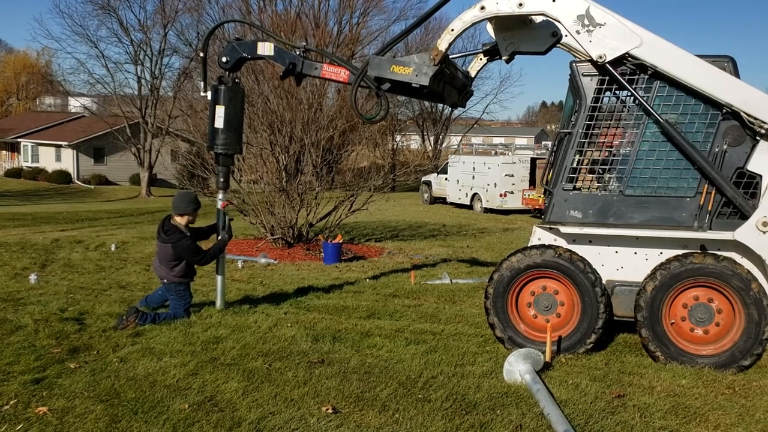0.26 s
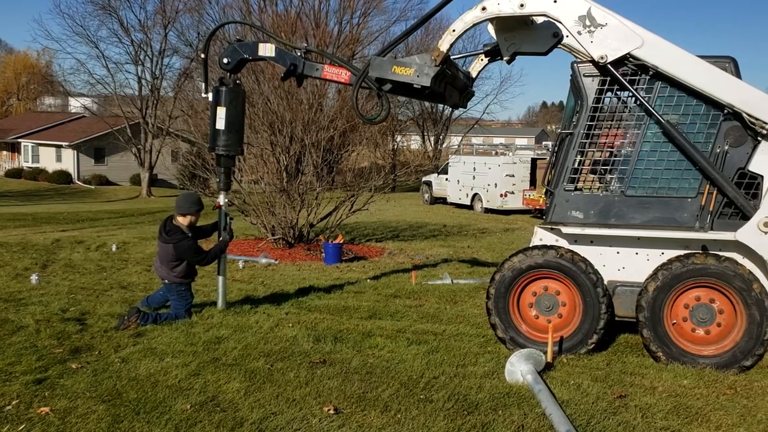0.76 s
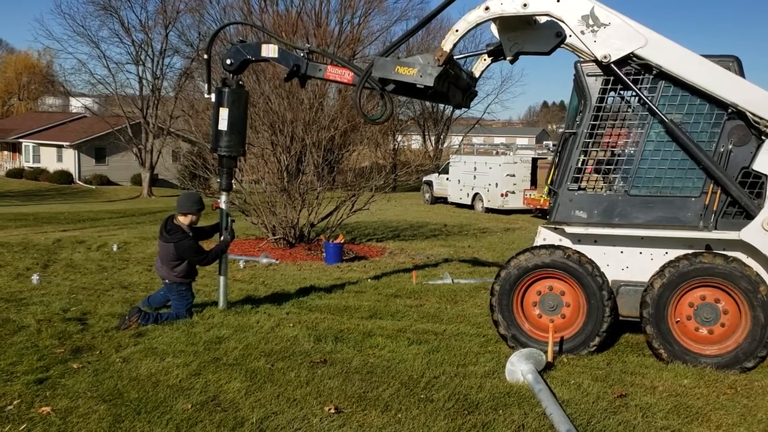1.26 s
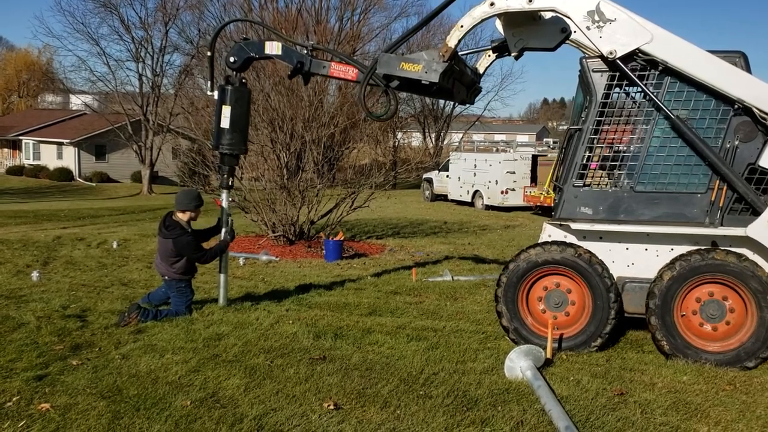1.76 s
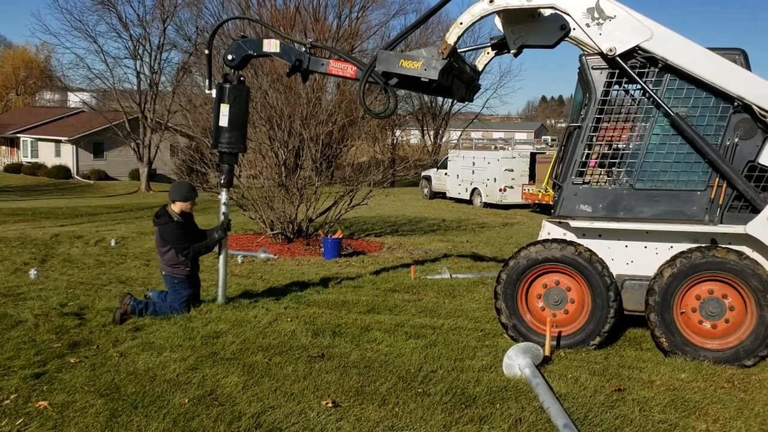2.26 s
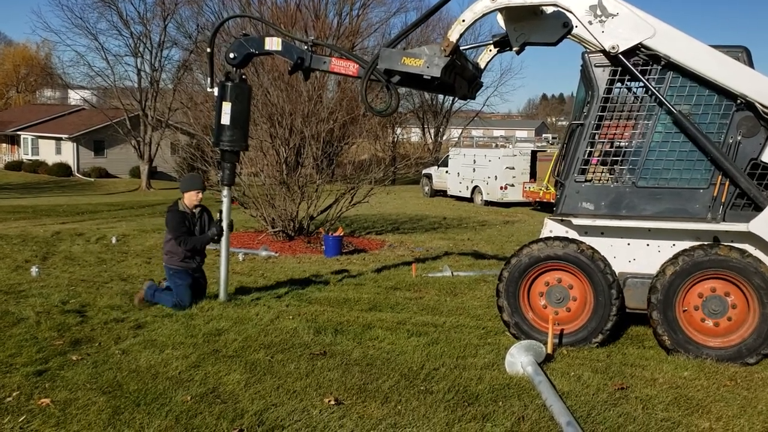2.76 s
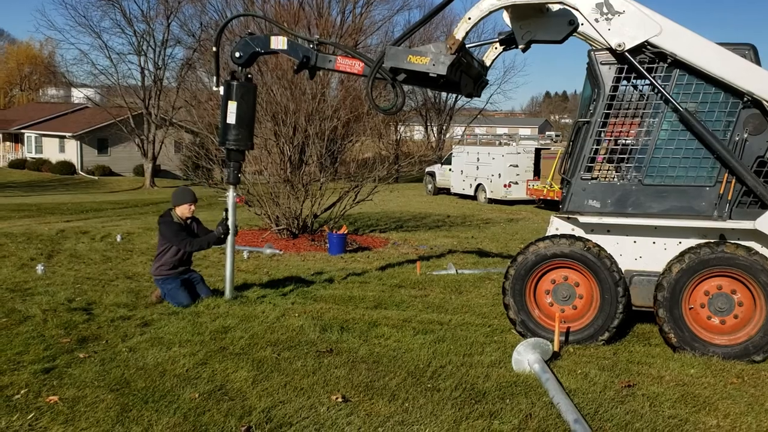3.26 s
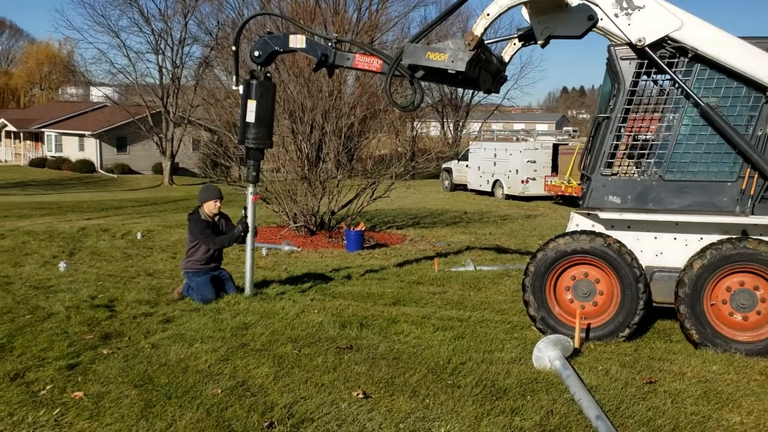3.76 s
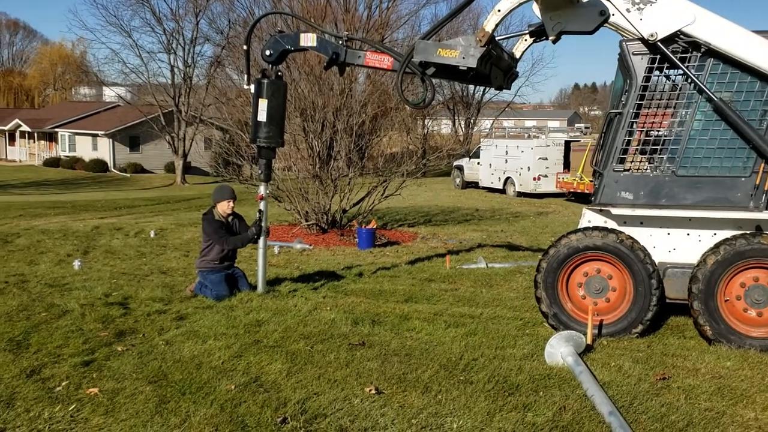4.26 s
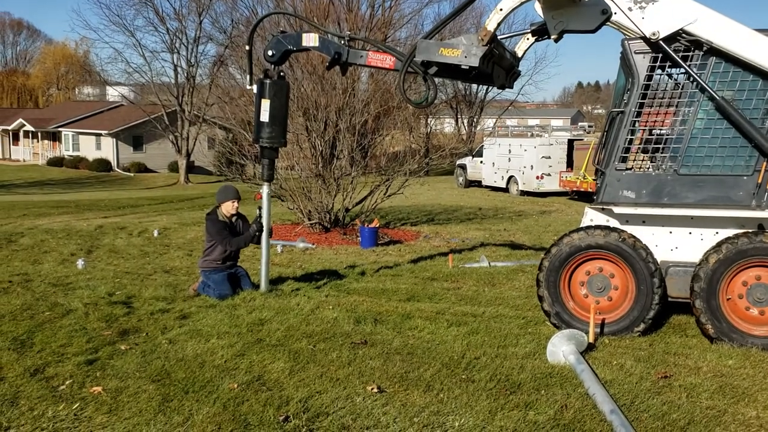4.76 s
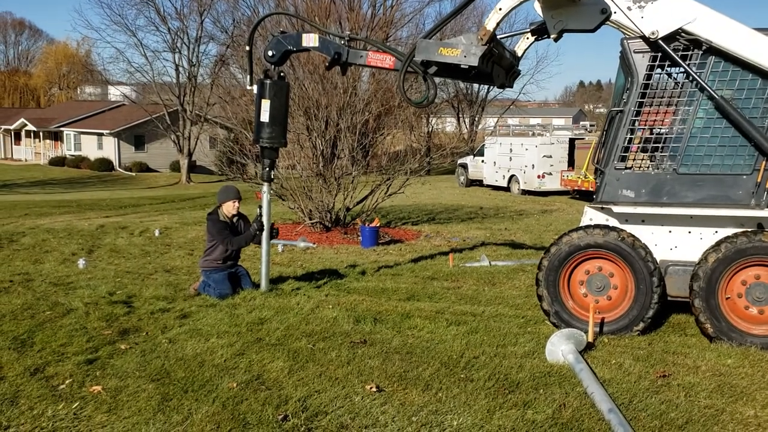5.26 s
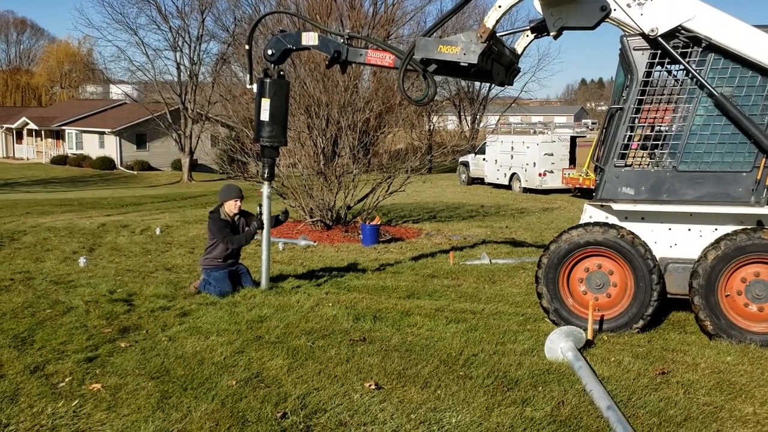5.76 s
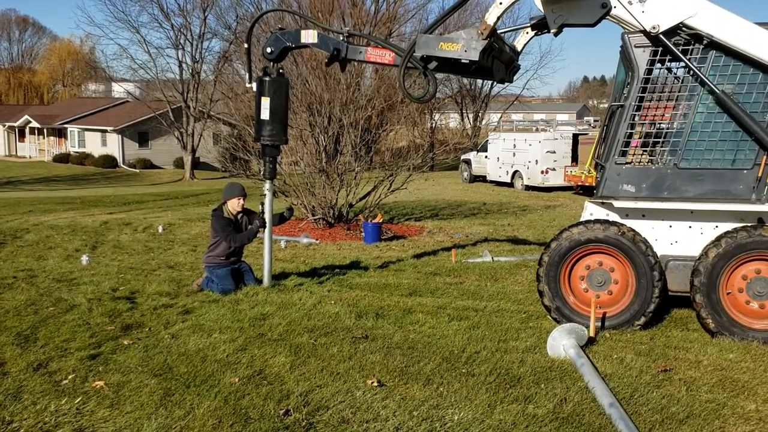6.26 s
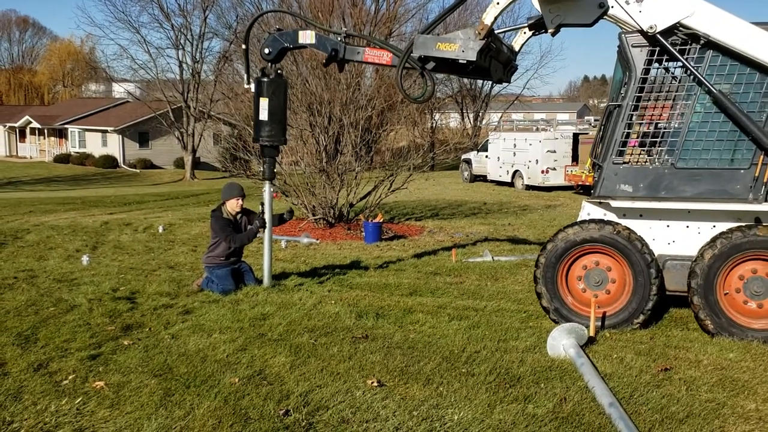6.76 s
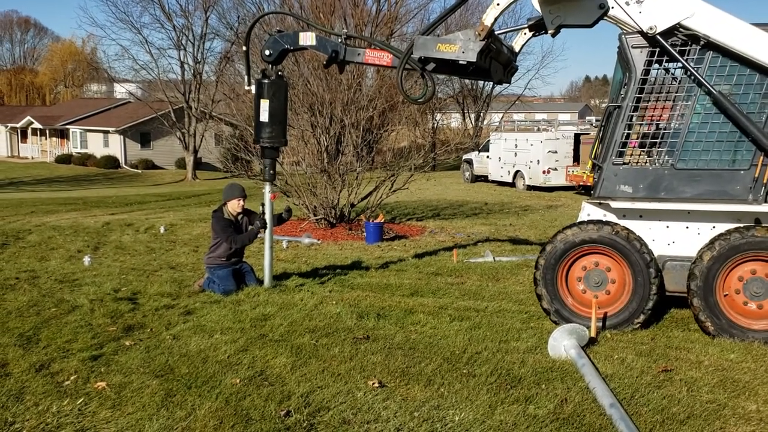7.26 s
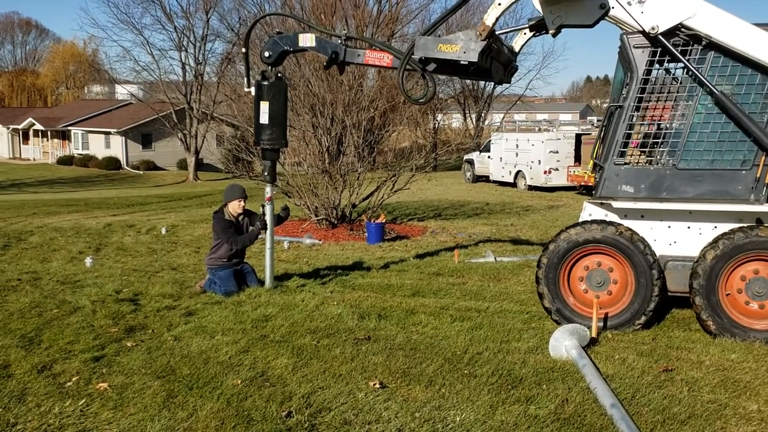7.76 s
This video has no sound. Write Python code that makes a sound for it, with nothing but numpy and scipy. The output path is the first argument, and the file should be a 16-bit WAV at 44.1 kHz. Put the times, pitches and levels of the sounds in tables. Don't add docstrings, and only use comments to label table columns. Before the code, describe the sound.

Outdoors on an open lawn, a four-cylinder diesel loader runs a few metres away, to the right. A deep, constant exhaust drone carries quick panel knocks, rough fan and valve-gear rush, and a hydraulic whine. Thin oil hiss sits on top, with two faint airy whistles around two and three seconds. Wind thumps the stereo microphone often at first, then occasionally.

```python
import sys
import numpy as np
from scipy import signal
from scipy.fft import rfft, irfft, next_fast_len
from scipy.io import wavfile
from scipy.ndimage import uniform_filter1d, map_coordinates

SR = 44100
rng = np.random.default_rng(int(sys.argv[2]) if len(sys.argv) > 2 else 0)


def invert_db(level):
    return 10 ** (np.asarray(level, dtype=float) / 20)


def generate_wav(sig):
    pcm = np.round(np.clip(np.atleast_2d(sig).T, -1, 1) * 32767).astype(np.int16)
    wavfile.write(sys.argv[1], SR, pcm)


N = 352800


def unit(x):
    return x / np.sqrt(np.mean(x ** 2) + 1e-20)


def along(points, hz):
    f, v = np.transpose(points)
    return np.interp(np.log(hz + 1), np.log(f + 1), v)


def curves(rows):
    s, *cols = np.transpose(rows)
    return [np.interp(np.arange(N) / SR, s, c) for c in cols]


def wobble(rate_hz):
    knots = rng.standard_normal(int(N * rate_hz / SR) + 4)
    return map_coordinates(knots, [np.arange(N) * rate_hz / SR])


def swells(s, half_s, db):
    t = np.arange(0, N + 64, 64) / SR
    bells = db * np.exp(-((t[:, None] - s) / half_s) ** 2)
    return np.interp(np.arange(N) / SR, t, bells.sum(axis=1))


def filtered(x, response):
    m = next_fast_len(N + SR // 2)
    return irfft(rfft(x, m) * response(np.fft.rfftfreq(m, 1 / SR)), m)[..., :N]


def noise(spectrum, alike, patchy_db):
    z = signal.stft(rng.standard_normal((2, N)), nperseg=512)[2]
    field = rng.standard_normal(z.shape[1:])
    field = uniform_filter1d(uniform_filter1d(field, size=8, axis=0), size=8, axis=1)
    pair = signal.istft(z * invert_db(patchy_db * unit(field)), nperseg=512)[1][:, :N]

    def mid_side(hz):
        angle = np.arccos(np.clip(along(alike, hz), -1, 1)) / 2
        return invert_db(along(spectrum, hz)) * [np.cos(angle), np.sin(angle)]

    mid, side = filtered(pair, mid_side)
    return unit(np.array([mid + side, mid - side]))


def exhaust(cycle, note_db):
    # order, level/dB
    orders = [(3, -33), (4, -1.5), (5, -79), (7, -53.5), (8, -14.5), (9, -53), (11, -49.5), (12, -30),
              (13, -38.5)]
    # t/s, level/dB
    puffs = [(.12, 1), (.17, -17), (.22, 3.5), (.27, -4), (.325, 11), (.405, -18), (.47, 2), (.51, -16),
             (.55, 5.5), (.59, -22), (.65, 1), (.76, 0), (.85, 6.5), (.95, -2), (1.17, 7), (1.23, -7),
             (1.4, -6), (1.46, -17), (1.58, 6.5), (1.69, -7), (2.11, -2), (2.39, -3), (2.78, -1),
             (3.06, -2.5), (4.69, 0), (5.76, -2), (5.85, -3.5), (6.01, -2.5), (6.52, -3), (6.83, -1.5)]
    puff_half_s, crest_rad, full_note_db, brightens = .021, .075, 30, 0.68
    s, puff_db = np.transpose(puffs)
    sway_db = swells(s, puff_half_s, puff_db)
    slack_db = np.minimum(note_db - full_note_db, 0)
    total = 0
    for k, db in orders:
        level_db = db + note_db + 3.5 + 0.24 * wobble(30) + sway_db * (4 / k) ** 2
        level_db = level_db + brightens * slack_db * (k / 4 - 0.5)
        total = total + invert_db(level_db) * np.cos(k * (2 * np.pi * cycle + crest_rad) - .3)
    return total


def knock(cycle):
    # f/Hz, width/Hz, level/dB
    panel_modes = [(525, 22, -3.6), (585, 20.5, 0)]
    # f/Hz, width/Hz, level/dB
    frame_modes = [(821, 48, -16.5), (1520, 63, -14), (2245, 240, -18), (2885, 140, -17), (3950, 307, -23)]
    knock_at_cycles, jitter_cycles, spread_db = .405, 0.0022, 0.5
    panel_late_s, rebound_s, rebound_db = .00446, .01772, -5
    turns = np.arange(int(cycle[-1]))
    chance = rng.standard_normal((len(turns), 2))
    at = np.interp(turns + knock_at_cycles + jitter_cycles * chance[:, 0], cycle, np.arange(N)).astype(int)
    blows = np.bincount(at, invert_db(spread_db * chance[:, 1]), N)

    def ring(f, modes):
        total = 0
        for k, (c, w, db) in enumerate(modes):
            total = total + (-1) ** k * invert_db(db) * 1j * f * w / (c * c - f * f + 1j * f * w)
        return total

    def late(f, s):
        return np.exp(-2j * np.pi * f * s)

    def response(f):
        twice = late(f, panel_late_s) * (1 + invert_db(rebound_db) * late(f, rebound_s))
        soft = 1 / (1 + 1j * f / 3500) ** 4
        return (ring(f, panel_modes) * twice + ring(f, frame_modes)) * soft

    return unit(filtered(blows, response))


def rush(cycle):
    # f/Hz, density/dB per Hz
    bay_spectrum = [(40, -63.5), (150, -59), (310, -70.5), (560, -57), (900, -67.5), (1400, -66.5),
                    (2200, -66), (2600, -75), (2800, -74.5), (3200, -81), (3900, -79.5), (4600, -81),
                    (5000, -81), (5600, -83), (7200, -105), (9000, -125)]
    # f/Hz, left-right likeness
    bay_alike = [(100, .97), (1000, .92), (2300, .85), (3250, .4), (3900, .9), (4600, .84), (5400, .72),
                 (5800, .75), (6300, .3)]
    rattle_swell_db, rattle_at_cycles = 5, .62
    pulse_db = 0.55 * np.cos(8 * np.pi * cycle) + 0.12 * wobble(4.9) + 0.85 * wobble(260)
    bay = invert_db(pulse_db) * noise(bay_spectrum, bay_alike, patchy_db=0.65)
    rattle_spectrum = [(300, -16), (470, -3.0), (545, 25), (680, 6.0), (900, -44), (3000, -120)]
    swell_db = rattle_swell_db * np.cos(2 * np.pi * (cycle - rattle_at_cycles))
    rattle = invert_db(swell_db) * noise(rattle_spectrum, [(500, 0.94)], patchy_db=-1.5)
    return unit(bay) + invert_db(-10.0) * unit(rattle)


def clatter(cycle):
    # order, level/dB
    high_orders = [(44, 0.5), (56, -7.5), (62, -12), (68, -2), (75, 0.5), (77, 1.5), (81, -10), (93, -10.5),
                   (96, -11.5), (100, -4), (115, -11), (154, -15.5)]
    total = 0
    for k, db in high_orders:
        phase_cycles = k * cycle + 0.14 * wobble(7.6)
        total = total + invert_db(db + 2.8 * wobble(3.2)) * np.sin(2 * np.pi * phase_cycles)
    return total


def whine(cycle):
    # multiple of pump rate, level/dB
    pulsation = [(2, 11), (4, 2), (10, -13), (14, -8.5)]
    # t/s, level/dB
    load = [(0, -4.5), (1.65, -4), (1.85, -0.5), (4, 0), (6.7, 0), (7, -1.5), (8, -1.5)]
    # f/Hz, level/dB
    fan_hz, fan_db = (272.1, .5)
    pump_ratio, overtone_db = 2.6681, 0
    pump = 0
    for k, db in pulsation:
        phase_cycles = k * 4 * pump_ratio * cycle + 0.024 * k * wobble(5.4)
        pump = pump + invert_db(db + 1.2 * wobble(5.8)) * np.sin(2 * np.pi * phase_cycles)
    blades = 2 * np.pi * (fan_hz * np.arange(N) / SR + .08 * wobble(6))
    fan = invert_db(fan_db + 1.8 * wobble(5)) * (np.sin(blades) + invert_db(overtone_db) * np.sin(2 * blades))
    return invert_db(curves(load)[0]) * pump + fan


def hiss():
    # f/Hz, density/dB per Hz
    oil_spectrum = [(5000, -45), (7200, -10), (9500, -8.5), (10300, -8.5), (12000, 0), (14000, -0.5),
                    (15740, 0.5), (15800, -35)]
    grain_db = .9 * wobble(22) + .7 * wobble(40) + 1.2 * wobble(400)
    oil_alike = [(8000, .3), (11000, .3), (14500, .6)]
    return unit(invert_db(grain_db) * noise(oil_spectrum, oil_alike, patchy_db=.9))


def spool():
    # t/s, half length/s, level/dB
    strokes = [
        (1.9, 0.3, 20),
        (2.995, .35, 24.5),
    ]
    # f/Hz, density/dB per Hz
    whistle_band = [(13000, -42.5), (14000, -3.5), (14500, -2.5), (15000, -6.5), (15700, -42)]
    level_db = -36.5 + swells(*np.transpose(strokes))
    return invert_db(level_db) * noise(whistle_band, [(14500, 0.54)], patchy_db=0.5)


def wind():
    # t/s, strength/dB
    strength = [(0, -40), (.6, -41), (1.05, -38.5), (1.35, -40), (1.7, -38), (1.9, -40), (2.6, -42),
                (3, -39), (3.3, -46.5), (4.4, -43.5), (4.8, -44.5), (5.4, -44.5), (5.8, -41), (6.8, -41),
                (7.1, -45), (8, -43.5)]
    # t/s, half length/s, buffet/dB, flutter/dB over the wind
    gusts = [(0.015, 0.04, 10.5, 1), (0.172, 0.054, 12.5, 5.5), (0.338, 0.035, 17, 10.5),
             (0.444, .06, 5, 11), (0.562, 0.041, 7.5, 8.5), (0.715, 0.044, 8, 4), (0.842, 0.037, -1, 2.5),
             (0.935, 0.045, 3, 1), (1.124, 0.029, 6, 5.5), (1.312, 0.016, 0, 7.5), (1.454, 0.1, 8, 5),
             (1.57, 0.031, 7, 6), (1.657, 0.031, 15, 6.5), (2.137, 0.066, 0, -0.5), (2.38, 0.017, 0.5, 7),
             (2.76, 0.024, 2, -3), (3.072, .07, 9, 5.5), (4.626, .05, 8, 4), (4.718, .04, 4, 2),
             (4.95, 0.035, 4, -1), (5.87, 0.053, 9, 0), (5.99, .04, 6.5, 2), (6.045, 0.07, 6, 1),
             (6.51, 0.021, 10.5, -2), (6.797, .05, 6, 5)]
    # f/Hz, density/dB per Hz
    buffet_spectrum = [(22, -19), (42, -2), (62, -6), (84, -5), (105, -1), (150, -7), (200, -20),
                       (400, -50), (1500, -120)]
    # f/Hz, density/dB per Hz
    flutter_spectrum = [(90, -27), (170, 7), (300, 1), (500, -5), (1100, -17.5), (2200, -35.5),
                        (5000, -120)]
    mean_flutter_db, flutter_grows = -42, 1.34
    strength_db, = curves(strength)
    s, half_s, buffet_db, flutter_db = np.transpose(gusts)
    flutter_db = flutter_grows * (strength_db - strength_db.mean()) + swells(s, half_s, flutter_db)

    def lumps(depth_db, rate_hz):
        return invert_db(depth_db * np.array([wobble(rate_hz), wobble(rate_hz)]))

    buffet = unit(lumps(1.5, 20) * noise(buffet_spectrum, [(50, .5)], patchy_db=1))
    flutter = unit(lumps(2, 30) * noise(flutter_spectrum, [(200, .4)], patchy_db=1))
    buffet_db = strength_db + swells(s, half_s, buffet_db) + 6
    return invert_db(buffet_db) * buffet + invert_db(flutter_db + mean_flutter_db) * flutter


def from_right(pair, lag_samples, shade_db, turn):
    # t/s, added left lag/samples
    pan = [(0, -1.1), (1.5, -.8), (2.5, -1), (3.6, -.2), (4.3, 0), (8, 0)]
    hz, s, z = signal.stft(pair * np.ones((2, 1)), SR, nperseg=1024)
    lag = lag_samples + np.interp(s, *np.transpose(pan))
    phase = along(turn, hz)[:, None] / 2 - np.pi * np.outer(hz, lag) / SR
    shade = invert_db(-shade_db / 2 * hz ** 2 / (hz ** 2 + 250 ** 2))
    half = np.exp(1j * phase) * shade[:, None]
    return signal.istft(z * [half, 1 / half], SR, nperseg=1024)[1][:, :N]


def scene():
    # t/s, firing rate f/Hz
    speed = [(0, 72.55), (.5, 72.49), (1, 72.29), (1.5, 72.29), (2, 72.49), (2.5, 72.53), (3, 72.65),
             (3.5, 72.61), (4, 72.67), (4.5, 72.65), (5, 72.63), (5.5, 72.67), (6, 72.63), (6.5, 72.79),
             (7, 72.81), (7.5, 72.73), (8, 72.7)]
    # t/s, gain/dB, exhaust/dB above it
    gain = [(0, -52, 30), (.5, -53.5, 29), (1.2, -52.5, 29), (1.8, -50, 29.5), (2.7, -49, 29.5),
            (3.2, -47.5, 30.5), (4.5, -47.5, 30.5), (6.5, -48.5, 32), (8, -48.5, 32.5)]
    # f/Hz, phase/rad
    port_phase = [(150, 0), (280, -.45), (450, -.25), (750, 0),
                  (1800, 0), (2400, .4), (2800, 1.1), (3150, 3), (3400, 5.4), (3700, 6.2), (4800, 6.6),
              (6000, 6.3)]
    cycle = .0146 + np.cumsum(curves(speed)[0]) / (4 * SR)
    level_db, note_db = curves(gain)
    engine_bay = invert_db(-1.5) * clatter(cycle) + invert_db(3.5) * whine(cycle)
    engine_bay = engine_bay + invert_db(11.0) * knock(cycle) + invert_db(13.0) * rush(cycle)
    machine = invert_db(level_db) * (exhaust(cycle, note_db) + engine_bay)
    oil = invert_db(level_db - 11) * (hiss() + spool())
    machine = from_right(machine, 13, 1.9, port_phase)
    oil = from_right(oil, 10.15, 4.6, [(0, 0)])
    return machine + oil + wind()


def low_pass(x):
    return signal.sosfilt(signal.butter(12, 15730, fs=SR, output="sos"), x)


def record(dry):
    return low_pass(dry)


dry = scene()
out = record(dry)
generate_wav(out)
```